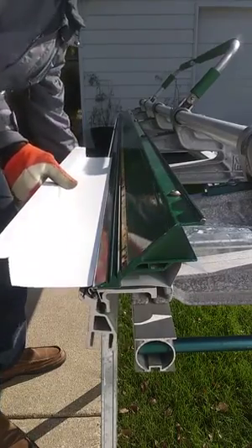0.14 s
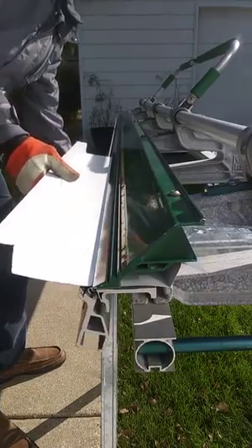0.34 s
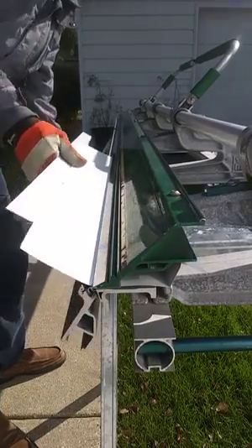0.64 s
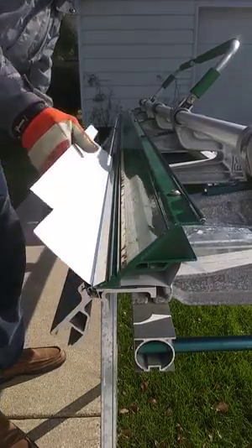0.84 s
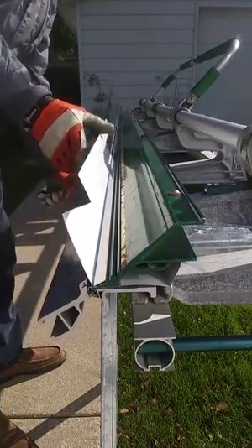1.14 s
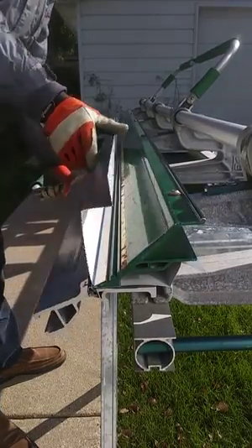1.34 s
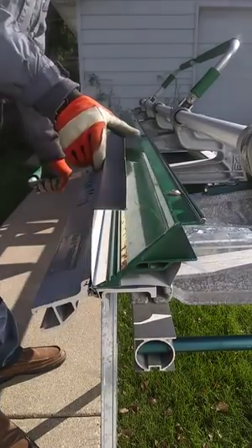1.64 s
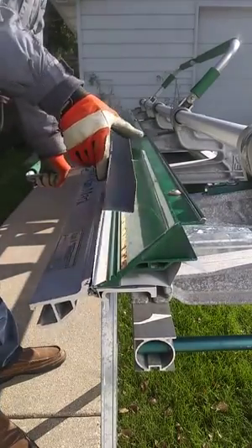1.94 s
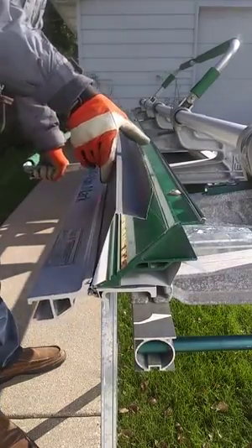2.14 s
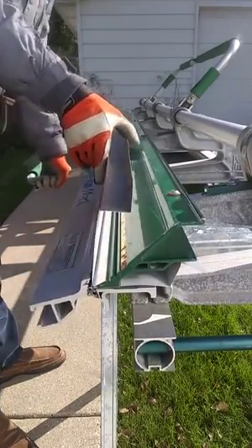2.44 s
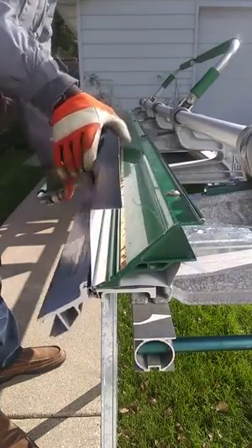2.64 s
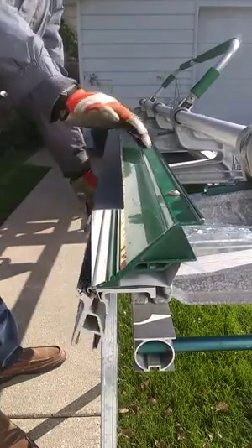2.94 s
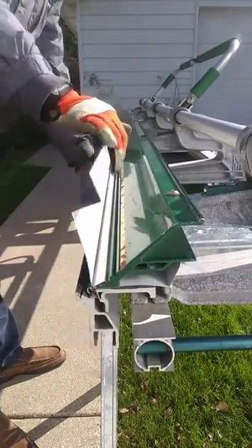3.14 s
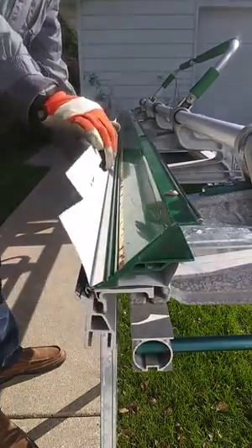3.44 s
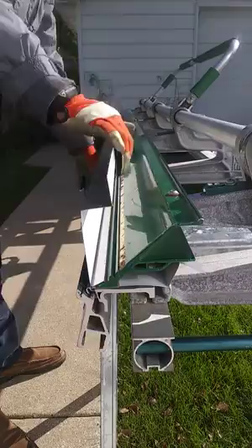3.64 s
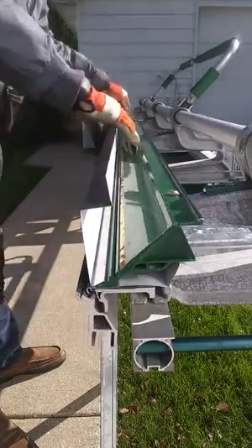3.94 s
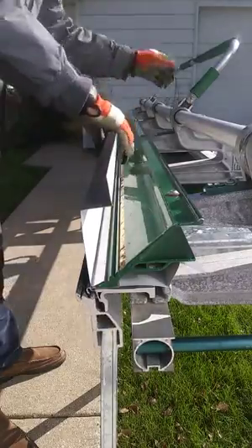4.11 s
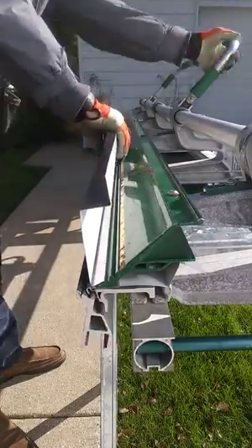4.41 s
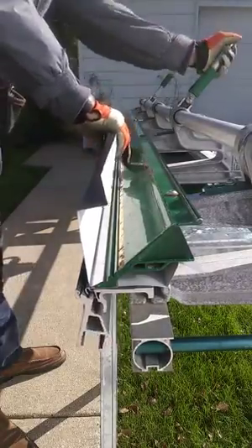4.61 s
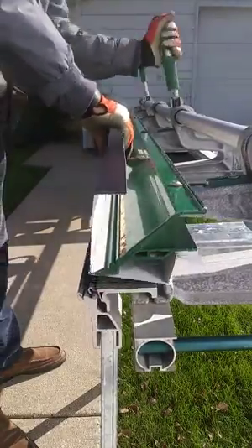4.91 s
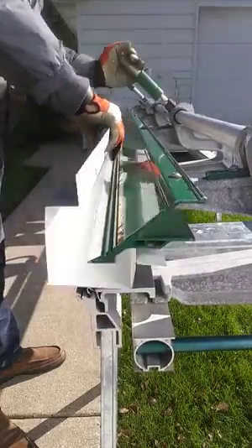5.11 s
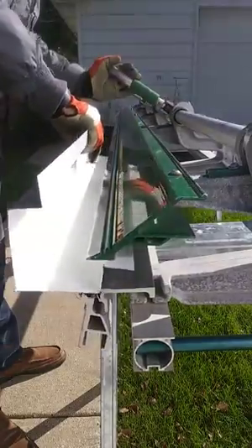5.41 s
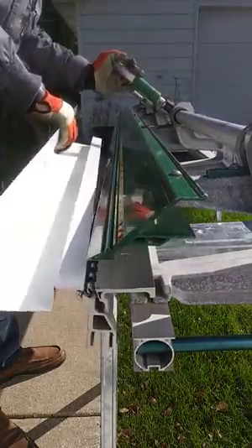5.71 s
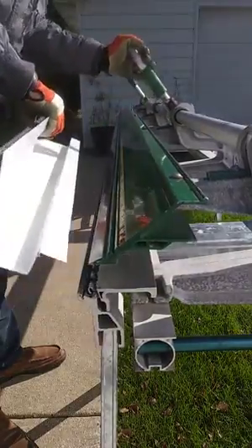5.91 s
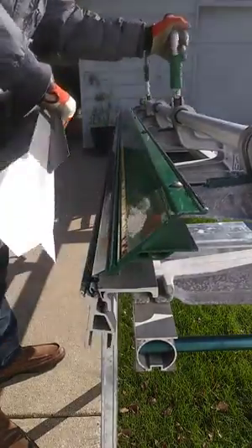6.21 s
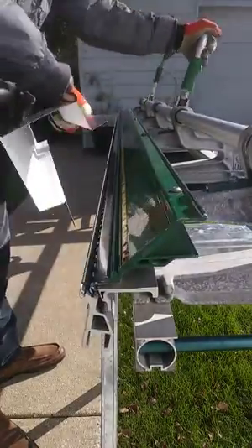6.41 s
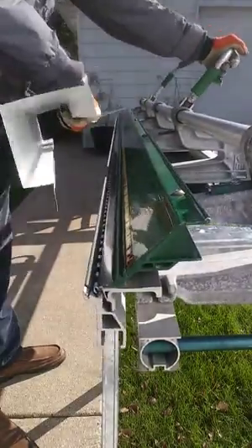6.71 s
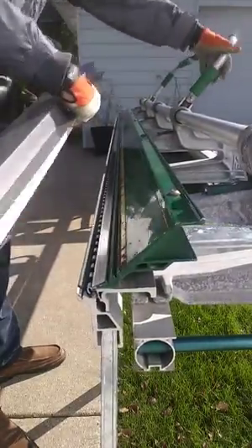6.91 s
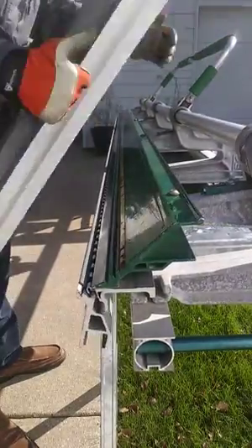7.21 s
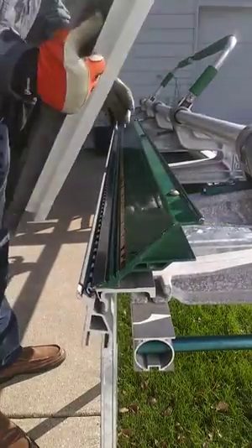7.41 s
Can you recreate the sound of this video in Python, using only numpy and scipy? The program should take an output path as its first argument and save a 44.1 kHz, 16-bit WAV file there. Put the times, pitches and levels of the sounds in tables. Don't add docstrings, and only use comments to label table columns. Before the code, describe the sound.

Thin sheet metal squeals and scrapes as it is bent on a hand brake outdoors, then clanks, snaps and rattles loose over faint wind rumble.

```python
import sys
import numpy as np
from scipy import signal
from scipy.fft import rfft, irfft, next_fast_len
from scipy.io import wavfile
from scipy.ndimage import uniform_filter1d, minimum_filter1d, map_coordinates

SR = 44100
rng = np.random.default_rng(int(sys.argv[2]) if len(sys.argv) > 2 else 0)


def transcribe(signal):
    frames = np.atleast_2d(signal).T
    limited = np.clip(frames, -1, 1)
    pcm = np.round(limited * 32767).astype(np.int16)
    wavfile.write(sys.argv[1], SR, pcm)


def decibels_to_gain(level_db):
    exponent = np.asarray(level_db, float) / 20
    return 10 ** exponent


N = 333286
T = np.arange(N) / SR

# crest_s, crest_db, rise_s, fall_s (rise and fall over 20 dB)
SURGES = [(.268, -32.5, 0.012, 0.11), (.655, -34, .1, .03), (.7, -15, 0.029, 0.29),
          (.876, -22, 0.013, 0.13), (1.079, -17, 0.025, 0.48), (1.26, -23.5, .25, 0.28),
          (1.39, -29, 0.17, .06), (1.48, -27.5, .06, 0.15), (1.56, -20.5, 0.11, 0.093),
          (1.63, -29.5, 0.12, 0.035), (2.157, -19.5, 0.15, 0.098), (2.212, -35, 0.068, 0.34),
          (2.086, -21.5, 0.025, 0.054), (2.558, -24.5, 0.014, 0.14), (2.714, -9, 0.024, .13),
          (2.766, -11, 0.043, 0.036), (2.83, -22.5, .06, 0.081), (2.915, -17, 0.11, 0.075),
          (3.15, -38.5, .45, 0.064), (3.283, -13, 0.032, 0.08), (3.39, -31, 0.098, 0.091),
          (4.6, -31, .05, 0.097), (4.8, -35.5, 0.019, 0.15), (4.9, -26.5, 0.023, 0.58),
          (5.028, -27, 0.1, 0.015), (5.35, -40, 0.53, .055), (5.46, -23.5, 0.023, .021),
          (5.528, -22.5, 0.085, 0.19), (5.75, -29, 0.14, 0.089), (5.8, -43.5, .05, 0.28)]
# boom_re_mid_db, sizzle_re_mid_db
RUB_COLOUR = [
    (0.5, -18),
    (-11, -8.5),
    (-2.5, -19),
    (-0.5, -16),
    (-6, -7),
    (-3, -11.5),
    (-3, -2.5),
]
# centre_s, length_s, level_db
RUSTLES = [
    (0.11, 0.04, -45),
    (6.746, 0.027, -38),
]
# start_s, peak_db, brightness_db, t60_s
BLOWS = [(0.2624, -22, -6, 0.11), (0.659, -32.5, 12.5, 0.059), (0.6814, -10.5, -2, 0.017),
         (3.2625, -15, -7, 0.06), (2.3521, -24.5, -4, 0.077), (2.5429, -1.5, -2, 0.11),
         (2.692, -11, -5, 0.055), (2.777, -11, -5, 0.045), (3.526, -21, 9, 0.17), (3.5544, -24.5, 9, 0.091),
         (4.5582, -6, -1, 0.1), (4.8783, -25, 2, .08), (4.9775, -22, 2, .08), (5.089, -14, -3, .07),
         (5.574, -24, 6, .04), (5.619, -30, 12, .025), (5.66, -28, 12, .025), (2.7055, -14, 1, .05),
         (2.8953, -18, 0, .06), (3.1417, -28, 2, .05), (3.2734, -8, -2, .08), (3.288, -6, -3, .09),
         (1.375, -22, -4, .08), (4.9077, -7.5, -6.5, 0.088), (5.0477, -6.5, -1.5, 0.13),
         (5.069, -7.5, -1.5, 0.11), (5.1062, 0.3, 2, 0.09), (5.1294, -6.5, -3, 0.15),
         (5.1645, 0.5, -3.5, 0.091), (5.184, -17.5, 8, 0.15), (5.2126, 4, -1, 0.073), (5.236, -3, -2, 0.12),
         (5.2765, -7, -7, 0.25), (5.2893, -9, 1, 0.08), (5.434, -14, -10.5, 0.16), (5.4666, 12, 3, 0.085),
         (5.4896, -5, -3, 0.15), (5.668, -24, 12, 0.034), (5.696, -14.5, 4.5, 0.076),
         (5.7344, -10.5, 3.5, 0.075), (5.7982, -22.5, 2, 0.11)]
EDGES_HZ = [1100, 4000]
# pitch_hz, width_hz, level_db
BENDING_MODES = [(858, 31, -7.5), (1443, 19, 8.5), (1768, 61, -2.5), (1947, 12, 6), (2164, 21, -3),
                 (2570, 42, -3), (2770, 28, -31), (3280, 29, -7)]
GRIPPED_MODES = [(696, 35, -17.5), (1003, 23, 6.5), (1240, 10, -32.5), (1783, 17, -14), (2706, 65, -6.5),
                 (3360, 98, -1.5), (3700, 140, -16.5), (5400, 25, -20), (5700, 450, -16), (6900, 15, -16),
                 (6000, 17, -15.5), (9840, 27, -29.5)]
RELEASED_MODES = [(388, 43, -19.5), (556.7, 7.3, 2), (824, 25, -8), (1190, 30, -6), (1330, 30, -8),
                  (1612, 32, -12.5), (1903, 52, -0.5), (2590, 30, -10), (2880, 17, -7.5), (3410, 25, -4),
                  (4940, 28, -17), (5390, 15, -9), (7720, 8, -27), (10200, 20, -33), (14300, 200, -36)]
UNCLAMPED_MODES = [(255, 90, -13.5), (786, 40, -3), (983, 29, -13.5), (1580, 19, 3), (2000, 100, -12.5),
                   (2347, 82, -1.5), (3470, 36, -22), (3600, 50, -11.5), (4230, 40, -16), (4660, 50, -10.5),
                   (5820, 260, -20.5), (6200, 70, -13)]
DRAWN_MODES = [(680, 59, -13), (1480, 30, 9), (2260, 110, -2), (2773, 71, 3.5), (3430, 40, -18),
               (3700, 40, -4), (4360, 13, -7), (5680, 155, -4), (6780, 11, -3), (9300, 40, -30),
               (12200, 30, -34)]
FREED_MODES = [(470, 77, 0.5), (1003, 59, 4), (1640, 120, -6), (2177, 70, 6), (4250, 66, -8),
               (5600, 49, -17), (5960, 72, -3.5), (6600, 100, -4)]
# frequency_hz, density_db (per Hz)
WASH = [(240, -21), (400, -10), (544, 3.5), (606, -3), (787, 3.5), (863, -4.5), (1250, 0), (1600, 3.5),
        (1830, 0.5), (2780, -4.5), (4480, -13.5), (5550, -8.5), (6890, -22), (7320, -37), (15800, -86.5)]
# start_s, pitch_hz, level_db, t60_s
RINGS = [(0.282, 429, -25, 0.12), (2.56, 620, -23, 0.3), (2.575, 790, -21.5, 0.25),
         (2.762, 786, -6.5, 0.12), (2.72, 388, -23, 0.5), (2.892, 284.6, -27, 0.64),
         (2.98, 550, -29.5, 0.48), (3.314, 551, -15, 0.13), (3.407, 545, -23, 0.2),
         (3.527, 2160, -29, 0.07), (3.555, 1580, -30, 0.04), (4.56, 579, -23.5, 0.24),
         (4.912, 3700, -31.5, 0.41), (5.05, 963, -11, 0.082), (5.072, 945, -13, 0.2),
         (5.048, 2550, -10.5, 0.05), (5.111, 1580, -8, 0.075), (5.214, 1650, 0, 0.042),
         (5.236, 1535, -6, 0.062), (5.278, 1613, -15, 0.32), (5.204, 250, -32.5, 0.97),
         (5.469, 2910, 2, 0.032), (5.476, 1500, -12, 0.15), (5.49, 255, -26, 0.34),
         (5.735, 5600, -20, 0.15), (2.702, 5350, -15.5, 0.26), (2.746, 5530, -22, 0.11),
         (3.278, 5440, -23, .1), (.654, 2330, -23, .05), (3.262, 690, -20, .12), (3.277, 600, -13, .1),
         (3.28, 824, -17, .1), (3.285, 1860, -14, .08), (2.544, 1700, -14, .05), (2.546, 830, -16, .1),
         (3.355, 640, -22, .1), (3.38, 600, -24, .1), (2.7, 7730, -34, .3), (2.71, 3400, -18, .3),
         (4.562, 1100, -20, .06), (4.59, 620, -27, .2), (5.668, 9000, -38, .02), (5.165, 2600, -10, .04),
         (5.176, 1900, -14, .08), (5.13, 800, -18, .1), (4.96, 620, -26, .1), (1.375, 1480, -28, .1),
         (4.891, 1316, -27.5, 0.42)]
# time_s, level_db
SQUEAL_LOW = [(0.64, -84), (0.678, -22.5), (0.786, -23), (0.804, -19.5), (0.846, -18), (0.968, -34.5),
              (1.0, -47)]
SQUEAL_HIGH = [(0.64, -71), (0.677, -14), (0.69, -9), (0.79, -13), (0.84, -32), (0.94, -25.5), (1.0, -61)]
# time_s, low_hz, high_hz
SQUEAL_HZ = [(.64, 1550, 2390), (.7, 1553, 2410), (.8, 1560, 2435), (.87, 1560, 2500), (1.0, 1553, 2640)]
# centre_s, length_s, low_tone_db, high_tone_db
BREAKS = [
    (0.72, 0.009, -6, -14),
    (0.754, .004, -2, -4),
    (0.781, 0.0022, -20, -5),
    (0.835, 0.0068, -6, -8),
    (0.884, 0.0074, -9, 6.5),
    (0.926, 0.0048, -31, 3),
]
# low_multiple, high_multiple, level_db
MIXING = [(1, 0, 5.5), (2, 0, -6.5), (3, 0, -11), (4, 0, -11), (5, 0, -29), (0, 1, -7.5), (0, 2, -18.5),
          (0, 3, -39.5), (1, 1, -16), (2, 1, -16)]
# time_s, pitch_hz, level_db
CHATTER = [(1.053, 1240, -29), (1.079, 1228, -18), (1.111, 1232, -12.5), (1.15, 1234, -13.5),
           (1.18, 1236, -18), (1.23, 1240, -23)]
# multiple, level_db
CHATTER_ORDERS = [(5, -3), (6, -6.5), (7, -13), (9, -7), (10, -2), (14, -11.5), (15, -9), (20, -3.5),
                  (22, -12.5), (25, -30), (26, -30), (31, -27)]
# time_s, pitch_hz, level_db
SQUEAK = [(2.497, 975, -48), (2.508, 952, -20.5), (2.525, 980, -34), (2.535, 966, -25), (2.545, 960, -26)]
# multiple, level_db
SQUEAK_ORDERS = [(1, 0.5), (2, -7), (3, -17), (4, -18), (5, -25)]
# time_s, level_db
FLAP = [(0.65, -41), (0.718, -38), (0.738, -19.5), (0.818, -15.5), (1.028, -23), (1.088, -16.5),
        (1.16, -46), (1.255, -29), (1.3, -50)]
# pitch_hz, width_hz, level_db
FLAP_MODES = [(135, 89, -3), (196, 103, -1.5), (278, 83, -2), (394, 430, -13)]
# time_s, level_db
WIND = [(0.0, -41), (0.29, -44.5), (0.55, -38), (0.8, -29), (1.03, -36.5), (1.22, -30), (1.35, -43),
        (1.73, -34), (1.83, -44.5), (3.89, -45.5), (5.14, -45.5), (5.68, -33.5), (5.81, -43.5),
        (6.1, -35.5), (6.5, -38.5), (6.95, -39.5), (7.26, -35.5), (7.56, -40)]
# frequency_hz, density_db (per Hz)
RUMBLE = [(15, -64), (28, -20), (56, -3.5), (108, -1), (200, -7.5), (264, -11.5), (450, -24.5), (580, -64),
          (990, -120)]
# time_s, level_db
HISS_LEVEL = [(0, -43), (.6, -41.5), (1.9, -41.5), (3.7, -39.5), (4.5, -39), (6, -39.5), (6.75, -40),
              (7.56, -40)]
# frequency_hz, density_db (per Hz)
HISS = [(120, -18), (200, 1), (300, -2), (520, -3), (860, -6.5), (1270, -7.5), (2100, -7), (3600, -9.5),
        (4450, -15), (5900, -14), (6600, -22.5), (7500, -34), (11200, -45.5), (15800, -49)]


def contacts():
    stage = np.searchsorted([.5, 1.2, 2.47, 4.8, 5.425, 5.65], T)
    push = rubbing(stage)
    for s, length, db in RUSTLES:
        push[0] += decibels_to_gain(db) * np.exp(-.5 * ((T - s) / length) ** 2)
    pressure_db = 1.3 * wobble(45)
    push *= decibels_to_gain(pressure_db - 3.0)
    add_blows(push)
    force = push * grit(rate=5000, spread_db=8.5, smooth=1.15)
    # modes, wash_db, top_octave_db
    bodies = [(BENDING_MODES, -7, 4), (GRIPPED_MODES, -7, 11), (BENDING_MODES, -7, 5), (RELEASED_MODES, -7, 26),
              (UNCLAMPED_MODES, -8, -8), (DRAWN_MODES, -6, -3), (FREED_MODES, -5, 20)]
    ringing = sum(metal(force * (stage == k), *body) for k, body in enumerate(bodies))
    return flexing(ringing, patchy_db=1.5)


def rubbing(stage):
    firm_db = -24
    boom_lingers, sizzle_fades = 0.28, 0.23
    rounding = 1.19
    s, db, rise, fall = np.transpose(SURGES)[:, :, None]
    coarse = T[::32]
    since = coarse - s
    distance = np.where(since < 0, -since / np.abs(rise), since / np.abs(fall))
    power = np.sum(decibels_to_gain(db - 20 * distance ** rounding) ** 2, axis=0)
    level_db = np.interp(T, coarse, 10 * np.log10(power + 1e-12))
    lightness_db = firm_db - level_db
    boom_db, sizzle_db = uniform_filter1d(np.transpose(RUB_COLOUR)[:, stage], size=SR // 16)
    boom_db = boom_db + np.minimum(boom_lingers * lightness_db, 9)
    sizzle_db = sizzle_db - sizzle_fades * lightness_db
    return decibels_to_gain([level_db, level_db + boom_db, level_db + sizzle_db])


def add_blows(push):
    boom_db, sizzle_db = -9.5, -9.5
    after = T[:SR // 2]
    crack = 1 + 0.41 * np.exp(-after / 0.001)
    for s, db, bright_db, t60 in BLOWS:
        life = np.clip(t60, .01, .5) * np.array([[1], [1.3], [.75]])
        share_db = np.array([[0], [boom_db - bright_db], [sizzle_db + bright_db]])
        decay_db = 60 * (after / life) ** 1.226
        blow = crack * decibels_to_gain(db - 13.5 + share_db - decay_db)
        start = round(s * SR)
        part = slice(start, start + len(after))
        push[:, part] = np.hypot(push[:, part], blow)


def grit(rate, spread_db, smooth):
    size_db = spread_db * rng.uniform(-1.3, 1, N)
    hits = (rng.random(N) < rate / SR) * decibels_to_gain(size_db) * rng.standard_normal(N)
    return unit(unit(hits) + smooth * rng.standard_normal(N))


def metal(force, modes, wash_db, top_db):
    modes = [(c, w * (1 + (c / 4500) ** 2), db) for c, w, db in modes]
    busy = np.flatnonzero(force[0])
    m = next_fast_len(len(busy) + SR // 2)
    f = np.fft.rfftfreq(m, 1 / SR)
    top = top_db * np.clip((f - 7000) / 7000, 0, 1)
    body = resonances(modes, f) / (1 + (f / 11000) ** 4)
    body = body + decibels_to_gain(wash_db + along(WASH, f) + top)
    below = [1 / (1 + (f / edge) ** 12) for edge in EDGES_HZ]
    shares = body * np.array([below[1] - below[0], below[0], 1 - below[1]])
    shares /= np.sqrt(np.mean(np.abs(shares) ** 2, axis=1)[:, None])
    sound = irfft(np.sum(rfft(force[:, busy], m) * shares, axis=0), m)
    length = m - SR // 10
    out = np.zeros(N + m)
    out[busy[0]:][:length] = sound[:length]
    return out[:N]


def resonances(modes, f):
    return sum((-1) ** k * decibels_to_gain(db) * 1j * f * w / (c * c - f * f + 1j * f * w)
               for k, (c, w, db) in enumerate(modes))


def flexing(x, patchy_db):
    z = signal.stft(x, nperseg=512)[2]
    field = uniform_filter1d(rng.standard_normal(z.shape), size=3, axis=0)
    field = uniform_filter1d(field, size=5, axis=1)
    return signal.istft(z * decibels_to_gain(patchy_db * unit(field) - .3), nperseg=512)[1][:N]


def rings():
    out, after = np.zeros(N), T[:SR // 2]
    shake = .00013 * wobble(450)
    onset = 1 - np.exp(-after / 0.0006)
    for s, hz, db, t60 in RINGS:
        part = slice(round(s * SR), round(s * SR) + len(after))
        phase = 2 * np.pi * hz * after + hz * shake[part]
        out[part] += decibels_to_gain(db - 60 * after / t60) * onset * np.sin(phase)
    return decibels_to_gain(2.5 * wobble(110)) * out


def squeal():
    low_hz, high_hz = curves(SQUEAL_HZ)
    low = turns(low_hz, drift_hz=8.7, rate=72)
    high = turns(high_hz, drift_hz=12, rate=200)
    low_db, high_db = curves(SQUEAL_LOW)[0], curves(SQUEAL_HIGH)[0]
    for s, length, low_drop_db, high_drop_db in BREAKS:
        dip = np.exp(-.5 * ((T - s) / length) ** 2)
        low_db = low_db + low_drop_db * dip
        high_db = high_db + high_drop_db * dip
    out = np.zeros(N)
    for a, b, db in MIXING:
        a, b = round(a), round(b)
        level_db = (a * low_db + b * high_db) / (a + b)
        level_db += 0.11 * (a + b - 1) * (level_db + 12.0)
        level_db += db + 1.5 * np.sqrt(a + b) * wobble(130)
        out += decibels_to_gain(level_db + 6) * np.sin(a * low + b * high)
    return span(SQUEAL_LOW) * out


def chatter():
    return decibels_to_gain(1.2) * stack(CHATTER, CHATTER_ORDERS, 5, drift_hz=1.5, flutter_db=2.5, fade_db=7)


def squeak():
    return decibels_to_gain(1.0) * stack(SQUEAK, SQUEAK_ORDERS, 1, drift_hz=1.6, flutter_db=1.5, fade_db=6.0)


def stack(rows, orders, per, drift_hz, flutter_db, fade_db):
    hz, db = curves(rows)
    phase = turns(hz / per, drift_hz, rate=64)
    age = np.abs(T - rows[0][0])
    tones = np.zeros(N)
    for k, level in orders:
        level_db = level + flutter_db * wobble(70) - fade_db * k * age
        tones += decibels_to_gain(level_db) * np.sin(round(k) * phase + k * k)
    return span(rows) * decibels_to_gain(db) * tones


def flap():
    jerks = grit(rate=140, spread_db=5.0, smooth=0.88)
    swing = filtered(jerks, lambda f: resonances(FLAP_MODES, f) / (1 + (f / 600) ** 2))
    return span(FLAP) * decibels_to_gain(curves(FLAP)[0] - 3.0) * unit(swing)


def wind():
    level_db = curves(WIND)[0] + 1.8 * wobble(9) + 1.5 * wobble(25)
    return decibels_to_gain(level_db) * coloured_noise(RUMBLE)


def distant_hiss():
    return decibels_to_gain(curves(HISS_LEVEL)[0] + 0.3 * wobble(4.86)) * coloured_noise(HISS)


def coloured_noise(spectrum):
    return unit(filtered(rng.standard_normal(N), lambda hz: decibels_to_gain(along(spectrum, hz))))


def turns(hz, drift_hz, rate):
    return 2 * np.pi * np.cumsum(hz + drift_hz * wobble(rate)) / SR


def wobble(rate):
    coarse = T[::16]
    knots = rng.standard_normal(int(N * rate / SR) + 4)
    return np.interp(T, coarse, map_coordinates(knots, [coarse * rate]))


def filtered(x, response):
    m = next_fast_len(N + SR // 2)
    return irfft(rfft(x, m) * response(np.fft.rfftfreq(m, 1 / SR)), m)[..., :N]


def unit(x):
    return x / np.sqrt(np.mean(np.abs(x) ** 2) + 1e-20)


def along(points, hz):
    f, v = np.transpose(points)
    return np.interp(np.log(hz + 1), np.log(f + 1), v)


def curves(rows):
    s, *cols = np.transpose(rows)
    return [np.interp(T, s, c) for c in cols]


def span(rows):
    return np.clip(np.minimum(T - rows[0][0], rows[-1][0] - T) / .006, 0, 1)


def scene():
    work = contacts() + rings() + squeal() + chatter() + squeak() + flap()
    return (work + wind() + distant_hiss())[None]


def band_limit(x):
    return signal.sosfilt(signal.butter(12, 16470, fs=SR, output="sos"), x)


def record(dry):
    ceiling, hold = .9, 180
    x = filtered(dry, lambda hz: (1j * hz / (45 + 1j * hz)) ** 2 * (hz < 15830))
    need = np.minimum(1, ceiling / (np.abs(x) + 1e-9))
    gain = uniform_filter1d(minimum_filter1d(need, size=2 * hold), size=hold)
    return band_limit(x * gain)


dry = scene()
out = record(dry)
transcribe(out)
```